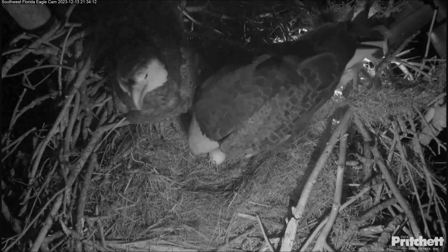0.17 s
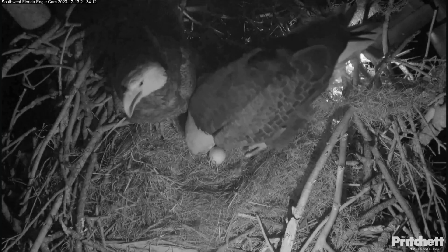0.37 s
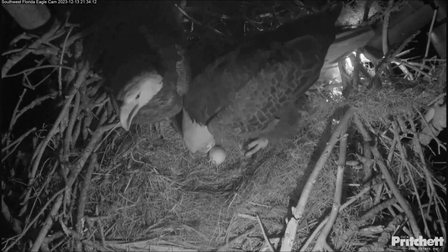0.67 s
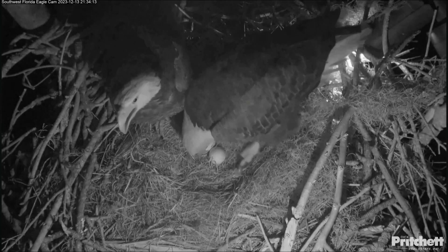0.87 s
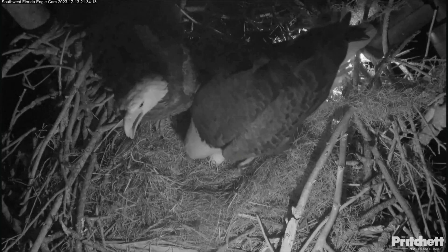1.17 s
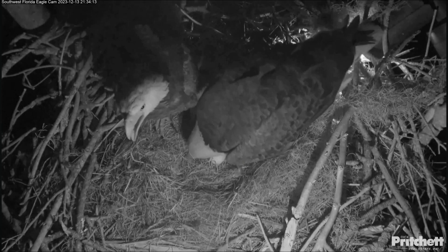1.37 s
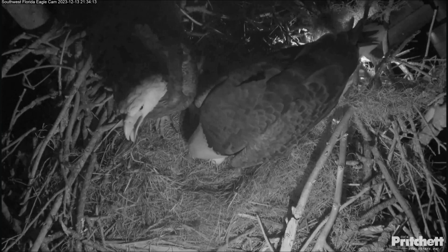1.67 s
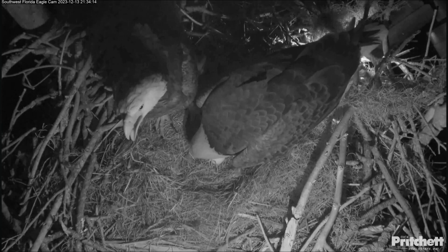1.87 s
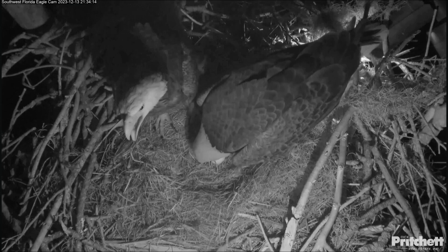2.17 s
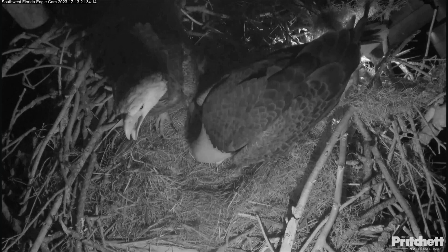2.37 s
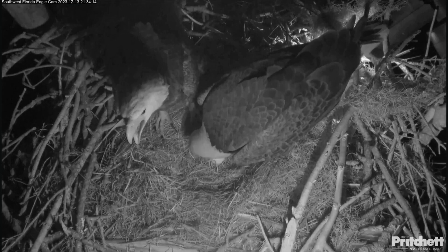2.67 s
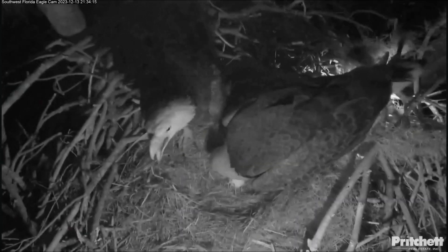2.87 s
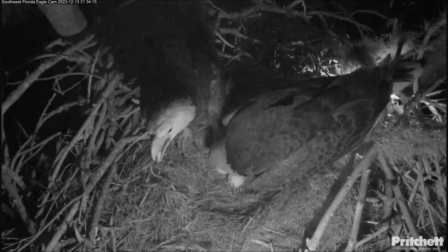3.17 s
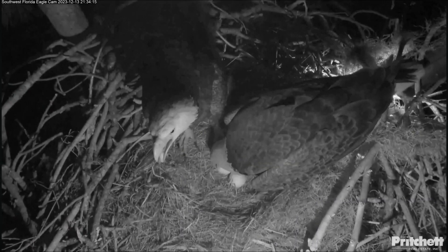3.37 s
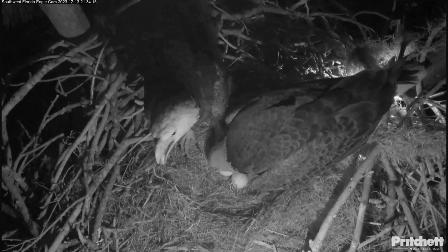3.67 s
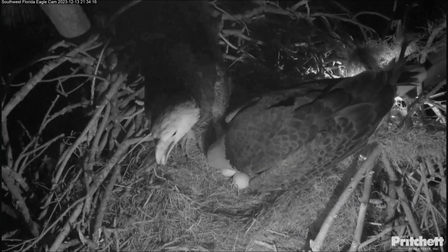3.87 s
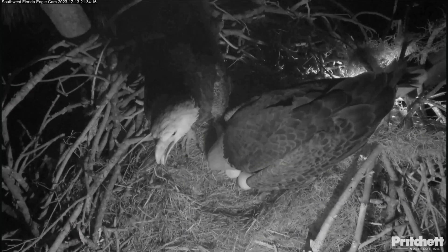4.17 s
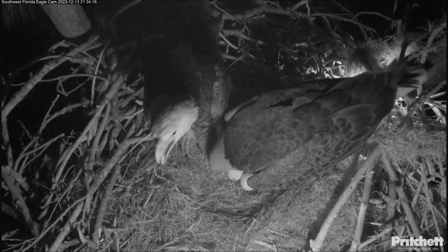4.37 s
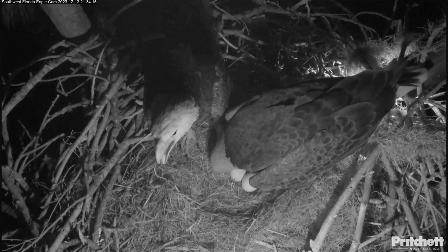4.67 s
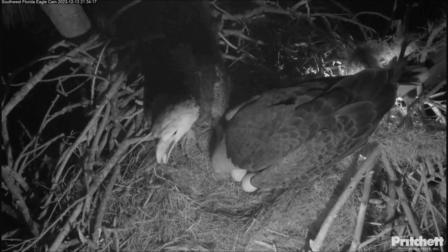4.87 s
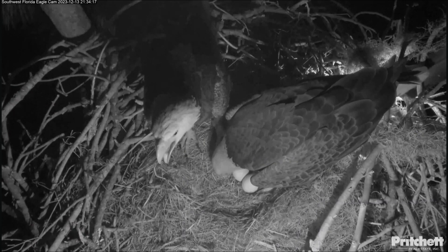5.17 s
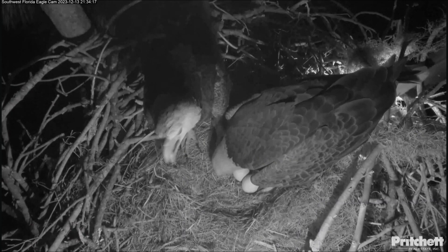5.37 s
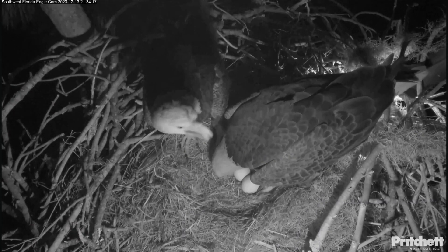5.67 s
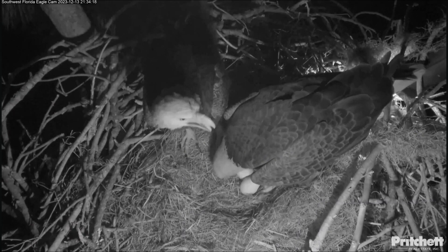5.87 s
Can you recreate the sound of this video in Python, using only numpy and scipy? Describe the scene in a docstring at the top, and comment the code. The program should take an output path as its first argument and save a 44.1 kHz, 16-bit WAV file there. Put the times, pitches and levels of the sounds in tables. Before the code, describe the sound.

A quiet night outdoors, heard close to a nest. From the start low wind bumps the microphone, with a strong muffled gust around 0.55-0.8 s and faint dry twig ticks near 0.4, 0.8 and 1.2 s. The sound drops out for an instant at 1.33 s. At 1.55 s a large bird starts chittering: a short trill, then very short, piercing, slightly raspy whistles about every eighth of a second, loudest at 1.7 s and fading to tiny clicky chirps by 2.5 s. Soft wind, faint far tyre roar and thin needle hiss remain; a twig ticks at 3.3 s. At 4.1 s a squeak and brief hoarse hiss lead into loud sharp calls at 4.3 and 4.5 s and a rougher, falling one at 4.75 s. Wind rumble continues, gusting near 5.7 s, with another tiny dropout, until 6 s.

```python
"""A bald eagle on its nest at night, close to a small outdoor microphone, with far traffic behind.
Wind bumps the microphone from the start, three twigs tick, and the sound cuts out briefly near 1.3 s.
From 1.5 s comes a run of sharp chitters: short trilled whistles, two sets of sine partials that beat
where they overlap. A twig ticks at 3.3 s; from 4.1 s a second run has a squeak, a hoarse hiss and loud calls.
Wind, a swelling and fading tyre roar and a thin hiss of needles, all shaped noise, last to the end."""
import sys
import numpy as np
from scipy import signal
from scipy.fft import rfft, irfft, next_fast_len
from scipy.io import wavfile
from scipy.ndimage import uniform_filter1d

SR = 44100
rng = np.random.default_rng(int(sys.argv[2]) if len(sys.argv) > 2 else 0)


def transcribe(u):
    """Save the signal u as a 16-bit wav file named by the first command-line argument.

    u: samples, shape (n,) or (channels, n), limited to [-1, 1]; the rate is SR.
    q: integer samples, one column per channel.
    """
    v = np.clip(np.atleast_2d(u).T, -1, 1)
    q = np.round(v * 32767).astype(np.int16)
    wavfile.write(sys.argv[1], SR, q)


N = 265393
TIME = np.arange(N) / SR
EDGE_HZ = 15500  # upper limit of the microphone


def gain_of(db):
    """Turns decibels into an amplitude factor."""
    return 10 ** (np.asarray(db) / 20)


def evened(x):
    """Scales to rms 1."""
    return x / np.sqrt(np.mean(x ** 2) + 1e-20)


def read(points, hz):
    """Reads a spectrum's dB at the given frequencies, along a log frequency axis."""
    point_hz, point_db = np.transpose(points)
    return np.interp(np.log(hz + 1), np.log(point_hz + 1), point_db)


def follow(rows, column=1):
    """Draws one column of a time curve at every sample."""
    rows = np.asarray(rows)
    return np.interp(TIME, rows[:, 0], rows[:, column])


def add(mix, start_s, sound):
    """Mixes a sound in at its start time."""
    part = mix[max(round(start_s * SR), 0):][:len(sound)]
    part += sound[:len(part)]


def noise(colour):
    """Gaussian noise of rms 1, filtered to the given spectrum."""
    size = next_fast_len(N)
    white = rfft(rng.standard_normal(size))
    hz = np.fft.rfftfreq(size, 1 / SR)
    return evened(irfft(white * gain_of(read(colour, hz)), size)[:N])


def wander(rate_hz):
    """Smooth random motion of rms 1, low-passed around the given rate."""
    size = next_fast_len(N)
    white = rfft(rng.standard_normal(size))
    hz = np.fft.rfftfreq(size, 1 / SR)
    return evened(irfft(white / (1 + (hz / rate_hz) ** 4), size)[:N])


def ticks(rows, colour, decay_s, rise_s=0.00058):
    """Tiny noise bursts with a quick rise and an exponential decay."""
    t = np.arange(2048) / SR
    shape = np.exp(-t / decay_s) * np.tanh(t / rise_s) ** 2
    envelope = np.zeros(N)
    for start_s, level_db in rows:
        add(envelope, start_s, gain_of(level_db) * shape)
    return envelope * noise(colour) / 2


def soft_window(width_s):
    """A two-sided exponential of sum 1, for smoothing."""
    window = np.exp(-2 * abs(np.arange(-2048, 2049) / SR) / width_s)
    return window / window.sum()


# trilled whistles close to the microphone; those that overlap come from the two sides of the syrinx.
# First run: a trill, four sharp calls, three fading chitters.
# Second run: a squeak, a hoarse stretch, three loud calls.
# start_s, length_s, strokes, start_hz, end_hz, droop (share of pitch, per stroke), level_db,
# peak_place (0-1), rasp_db and bright_db (both relative to the level, before the trims below)
WHISTLES = [ (1.544, 0.012, 1, 4310, 3680, 0.012, -56.5, 0.6, -30, -34),
            (1.562, 0.011, 1, 4360, 3960, 0, -48.5, 0.6, -23, -36.5),
            (1.573, 0.047, 1, 3480, 3090, 0, -49, 0.83, -31.5, -55.5),
            (1.577, 0.046, 3, 4240, 3560, .14, -38, 0.36, -28, -30),
            (1.625, 0.027, 2, 3320, 3580, 0.12, -53, 0.73, -17.5, -33),
            (1.675, 0.023, 2, 5160, 5290, 0.038, -30.5, 0.76, -47, -54.5),
            (1.679, 0.0093, 1, 4270, 4140, 0.072, -36, 0.6, -21, -40),
            (1.688, 0.015, 1, 4450, 4196, 0, -26.5, 0.75, -38, -40.5),
            (1.696, 0.029, 1, 4280, 4200, 0.027, -23, 0.16, -42, -29),
            (1.801, 0.013, 1, 5580, 5130, 0.0047, -45.5, 0.5, -16.5, -50),
            (1.817, 0.027, 2, 5270, 5100, 0.078, -36, 0.25, -36, -61),
            (1.805, 0.026, 3, 4560, 4170, .01, -36.5, 0.47, -37.5, -48),
            (1.832, 0.027, 2, 4250, 3920, 0.065, -36, 0.03, -24.5, -48),
            (1.847, 0.01, 1, 3280, 3080, 0, -55.5, 0.64, -10.5, -40),
            (1.942, 0.012, 2, 4210, 4040, 0.13, -43, 0.05, -13, -55),
            (1.943, 0.0084, 1, 5030, 4950, 0, -47.5, .5, -25, -51),
            (1.959, 0.013, 2, 4400, 4130, 0.08, -36, 0.2, -22, -60),
            (1.975, 0.018, 1, 4360, 3710, 0.024, -42.5, .5, -32, -52),
            (1.976, 0.0095, 1, 3500, 2870, 0.0071, -49.5, 0.56, -20.5, -49.5),
            (2.089, 0.01, 1, 3870, 4190, 0, -39, 1, -29, -66),
            (2.099, 0.0082, 1, 3250, 3100, 0, -47.5, .5, -24, -47),
            (2.107, 0.032, 4, 3253, 3080, 0.013, -39, 0.4, -12, -58),
            (2.228, 0.015, 1, 4330, 4120, 0.031, -62.5, .5, -9, -38),
            (2.246, 0.0068, 1, 3270, 3430, 0.018, -60, .5, -7, -42),
            (2.247, 0.0056, 1, 3970, 4450, 0.0031, -55.5, .5, -18.5, -35.5),
            (2.343, 0.0052, 1, 4080, 4430, 0.016, -70.5, 0.52, -20.5, -33),
            (2.345, 0.0085, 1, 5260, 5400, 0, -63.5, 0.54, -23.5, -36.5),
            (2.363, 0.0085, 1, 4300, 4170, 0, -66.5, .5, -2.5, -26),
            (2.453, 0.0064, 1, 3810, 4000, 0.051, -67, 0.42, -20, -43.5),
            (4.111, 0.011, 1, 4460, 3680, 0.023, -39, 0.75, -33, -65),
            (4.118, 0.018, 1, 3156, 3213, 0, -36, 0.25, -37.5, -55),
            (4.217, 0.0062, 1, 4810, 5030, 0.0092, -43.5, .5, -22, -59),
            (4.218, 0.0087, 1, 4260, 3690, 0.011, -44.5, .5, -26, -48),
            (4.232, 0.013, 1, 4140, 3780, 0.032, -44, 0.4, -27, -59),
            (4.235, 0.012, 1, 3270, 2690, 0, -51, .5, -13, -51),
            (4.315, 0.007, 1, 6640, 5450, 0.038, -47, 0.47, -16, -37),
            (4.322, 0.004, 1, 5200, 5120, 0.095, -31, .5, -32, -55),
            (4.323, 0.007, 1, 4200, 4640, 0, -38.5, 0.3, -24.5, -54),
            (4.327, 0.033, 2, 5290, 5420, 0.049, -25.5, .4, -46.5, -60),
            (4.342, 0.032, 2, 4520, 4033, 0.043, -28.5, 0.77, -45.5, -53),
            (4.506, 0.012, 1, 4000, 4250, 0.026, -33.5, .5, -12, -54),
            (4.515, 0.015, 1, 3190, 3370, 0.012, -26.5, .7, -31, -38),
            (4.527, 0.01, 1, 4590, 3980, 0, -35, .5, -11, -56),
            (4.538, 0.020, 2, 3420, 3176, 0.0059, -29, 0.45, -23, -41),
            (4.557, 0.015, 1, 3250, 2940, 0, -41, 0.1, -11.5, -37),
            (4.752, 0.017, 1, 3210, 2930, 0, -40.5, 0.56, -16, -45.5),
            (4.755, 0.011, 1, 5330, 5300, 0.01, -53, .5, -9, -33.5),
            (4.773, 0.04, 3, 3218, 2894, 0.091, -37, 0.38, -21, -42),
            (4.82, 0.0056, 1, 2840, 2430, 0.016, -63.5, .5, -14, -39.5)]
# second partial: pitch_hz, level_db (relative to the whistle)
OCTAVE = [(4000, -24), (5600, -15), (6100, -19.5), (6500, -7), (6850, -13), (7600, -32.5), (8500, -41),
          (10400, -51.5), (13000, -45.5)]
# third and fourth partials: pitch_hz, level_db (relative to the brightness)
OVERTONES = [(7000, -10), (8500, 4.5), (9700, 5.5), (11200, -4.5), (12300, -4), (12900, 2.5), (13800, -13),
             (16000, -33)]
# breath colour of the throat: pitch_hz, level_db (relative)
THROAT = [(600, -19.5), (1800, -12.5), (2400, 3.5), (2750, -12.5), (3300, 3.5), (4200, 1.5), (5300, -5),
          (6300, -11.5), (7200, -19), (8300, -28.5), (11000, -35.5), (15000, -39.5)]
# treble air noise of a forced whistle: pitch_hz, level_db (relative)
FIZZ = [(4500, -33.5), (6500, -0.5), (8300, 4), (9000, -3.5), (11200, -11), (12500, 1.5), (13500, 5),
        (14400, -0.5), (15200, -28)]
STROKE_OVERLAP_S = 0.0001
STROKE_ARCH = .008  # bulge in the middle of each stroke, share of the pitch
FADE_DB_PER_S = 340  # a whistle weakens on both sides of its peak


def syrinx(jitter=0.0041, rasp_jitter=.05, waver=.006, blur=.11, growth=.6, shimmer=0.14, edge=0.8,
           overtone_db=-1, octave_db=0.5, rasp_trim_db=-3, fizz_db=-4.0,
           leak_db=-47, leak_power=0.52, leak_s=0.026):
    """Gliding whistles break into strokes that swell and droop; raspy ones shake and carry air noise."""
    voice, air, fizz, effort = np.zeros((4, N))
    shake, flutter, drift = wander(1200), wander(450), wander(200)
    phases = rng.random(len(WHISTLES))
    for whistle, phase in zip(WHISTLES, phases):
        start_s, length_s, strokes, start_hz, end_hz, droop, level_db, peak_place, rasp_db, bright_db = whistle
        bounds = np.linspace(start_s, start_s + length_s, round(strokes) + 1)
        pitch_shake = jitter + rasp_jitter * gain_of(rasp_db)
        for begin, end in zip(bounds, bounds[1:]):
            first = round((begin - STROKE_OVERLAP_S) * SR)
            last = round((end + STROKE_OVERLAP_S) * SR)
            at = np.arange(first, last)
            in_stroke = np.linspace(0, 1, len(at))
            along = (TIME[at] - start_s) / length_s
            arch = abs(np.sin(np.pi * in_stroke))

            glide_hz = start_hz + (end_hz - start_hz) * along
            pitch_hz = glide_hz * (1 + droop * (.5 - in_stroke) + STROKE_ARCH * (arch - np.pi / 4))
            shaken_hz = pitch_hz * (1 + pitch_shake * shake[at] + waver * drift[at])
            angle = 2 * np.pi * (phase + np.cumsum(shaken_hz) / SR)

            octave_gain = gain_of(read(OCTAVE, 2 * pitch_hz)) + gain_of(bright_db + octave_db)
            upper = octave_gain * np.sin(2 * angle)
            for k in (3, 4):
                partial_gain = gain_of(bright_db + overtone_db + read(OVERTONES, k * pitch_hz))
                audible = k * pitch_hz < EDGE_HZ
                upper += partial_gain * audible * np.sin(k * (angle + blur * shake[at]))

            swell = evened(arch ** edge * np.exp(shimmer * flutter[at]))
            fade_db = FADE_DB_PER_S * length_s * abs(along - peak_place)
            envelope = gain_of(level_db - fade_db) * swell
            # overtones grow faster than the fundamental as the membranes swing wider
            drive = (envelope / gain_of(level_db)) ** growth
            voice[at] += np.sqrt(2) * envelope * (np.sin(angle) + drive * upper)
            air[at] += envelope * gain_of(rasp_db + rasp_trim_db)
            fizz[at] += envelope * drive * gain_of(bright_db + fizz_db)
            effort[at] += envelope
    # air keeps flowing just before, between and after the strokes; quiet calls are the airiest
    leak = gain_of(leak_db) * signal.oaconvolve(effort ** leak_power, soft_window(leak_s), "same")
    return voice + np.hypot(air, leak) * noise(THROAT) + fizz * noise(FIZZ)


# clicks of the throat opening at the start of a call: start_s, level_db (relative)
CLICKS = [(1.674, -53), (1.797, -43.5), (1.937, -49), (2.087, -37), (2.226, -43), (2.343, -41.5),
          (2.453, -53.5), (4.312, -37), (4.504, -51), (4.749, -49)]


def throat_clicks(trim_db=-2):
    """The throat opens with small bursts of breath-coloured noise."""
    return gain_of(trim_db) * ticks(CLICKS, THROAT, decay_s=.0035, rise_s=0.00064)


# hoarse hiss between two calls: time_s, level_db
HISS = [(4.132, -93), (4.141, -61.5), (4.175, -64.5), (4.208, -56.5), (4.218, -65), (4.25, -86)]
# its colour: pitch_hz, level_db (relative)
HISS_COLOUR = [(600, -11), (1700, 4.5), (2300, -1), (2900, -2), (4000, 0), (5100, 0), (6300, -15.5),
               (7500, -28), (12000, -34)]


def hoarse_hiss():
    """Breath noise follows a level curve and is silent outside it."""
    sounding = (TIME > HISS[0][0]) & (TIME < HISS[-1][0])
    return gain_of(follow(HISS)) * sounding * noise(HISS_COLOUR)


# faint arched tone inside the hoarse hiss: start_s, length_s, end_hz (at both ends), top_hz, level_db
GROAN = [(4.155, 0.042, 1860, 2367, -59.5)]


def groan(jitter=0.023):
    """A weak, unsteady sine rises and falls once in pitch and level."""
    start_s, length_s, low_hz, top_hz, level_db = GROAN[0]
    arch = np.sin(np.linspace(0, np.pi, round(length_s * SR)))
    hz = (low_hz + (top_hz - low_hz) * arch) * (1 + jitter * wander(890)[:len(arch)])
    tone = arch * np.sin(2 * np.pi * np.cumsum(hz) / SR)
    out = np.zeros(N)
    add(out, start_s, gain_of(level_db) * evened(tone))
    return out


def eagle(coupling=.2):
    """Whistles, throat clicks and one hoarse hiss with a tone in it."""
    whistles = syrinx()
    # the two sides share one airflow, which adds faint sum and difference tones
    highpass = signal.butter(2, 700, "highpass", fs=SR, output="sos")
    mixed_tones = signal.sosfilt(highpass, whistles ** 2)
    return whistles + groan() + coupling * mixed_tones + throat_clicks() + hoarse_hiss()


# twigs in the nest: start_s, level_db (relative)
TWIGS = [(0.4344, -64.5), (0.7756, -58.5), (1.1787, -61), (3.2594, -61)]
# their colour: pitch_hz, level_db (relative)
TWIG_COLOUR = [(500, -5), (1700, 4.5), (4500, -0.5), (7000, -8.5), (15000, -13)]


def twigs():
    """Dry twigs tick as tiny, fast-dying noise bursts."""
    return ticks(TWIGS, TWIG_COLOUR, decay_s=0.0027)


def nest(x, echo_db=-28, t60_s=.05):
    """The sticks of the nest scatter a short, faint echo: decaying noise after a 2 ms gap."""
    t = np.arange(SR // 4) / SR
    echo = rng.standard_normal(len(t)) * (t > .002) * gain_of(-60 * t / t60_s)
    echo = gain_of(echo_db) * echo / np.linalg.norm(echo)
    return x + signal.fftconvolve(x, echo)[:N]


# steady wind on the microphone: time_s, level_db
WIND = [(0, -55.5), (0.85, -55), (1.05, -62.5), (1.9, -64), (2.4, -62), (3.05, -61), (3.55, -63),
        (4.3, -59.5), (5.2, -58), (6.02, -59.5)]
# gusts on top of it: peak_s, decay_s, level_db (at the peak)
GUSTS = [(0.061, 0.038, -52.5), (0.564, 0.13, -38.5), (0.701, 0.055, -42.5), (0.86, 0.029, -49.5),
         (1.15, 0.05, -50), (3.241, 0.025, -53), (4.41, 0.022, -48), (4.70, .1, -52), (5.65, 0.095, -47),
         (5.815, .03, -44.5)]
# colour of the weaker wind: pitch_hz, level_db (per Hz, relative)
WIND_COLOUR = [(15, 2.5), (38, 6), (80, -0.5), (150, -7.5), (200, -15.5), (350, -28.5), (450, -23),
               (700, -58), (3000, -89)]
# colour of the stronger wind: pitch_hz, level_db (per Hz, relative)
GUST_COLOUR = [(20, -4), (50, 1.5), (110, 5), (200, -0.5), (330, -8), (500, -19), (750, -32), (1500, -54.5),
               (4000, -87)]
GUST_RISE_S = 0.022


def wind(lumpy_db=3.0, gust_db=-55, span_db=3):
    """Lumpy buffeting that reaches higher as it blows harder; gusts build quickly and die away."""
    power = gain_of(follow(WIND)) ** 2
    for peak_s, decay_s, level_db in GUSTS:
        away = np.maximum((peak_s - TIME) / GUST_RISE_S, (TIME - peak_s) / decay_s)
        power = power + (gain_of(level_db) * np.exp(-away)) ** 2
    strength_db = 10 * np.log10(power)
    # the share of gust colour grows with strength, up to 1 / 3.5
    gust_share = 1 / (3.5 + np.exp((gust_db - strength_db) / span_db))
    eddies = np.sqrt(1 - gust_share) * noise(WIND_COLOUR) + np.sqrt(gust_share) * noise(GUST_COLOUR)
    return gain_of(strength_db) * evened(eddies * gain_of(lumpy_db * wander(35)))


# far traffic: time_s, roar_db, edge_db
TRAFFIC = [(0, -80, -96.5), (0.6, -73.5, -88.5), (1.05, -76, -87.5), (1.5, -79, -85.5), (2.0, -78, -85.5),
           (2.6, -72.5, -94.5), (3.5, -74.5, -87.5), (4.0, -70.5, -73.5), (4.4, -69.5, -80.5),
           (5.0, -70, -76.5), (5.5, -72.5, -74.5), (6.02, -77.5, -94)]
# colour of the tyre roar: pitch_hz, level_db (per Hz, relative)
ROAR = [(150, -13), (370, -14), (510, -3.5), (660, -7.5), (900, 0.5), (1300, 0), (1600, -10), (2000, -17),
        (3000, -39.5)]
# colour of its bright edge: pitch_hz, level_db (per Hz, relative)
ROAR_EDGE = [(1100, -21), (1550, 2), (1850, -5), (2200, -1.5), (2900, -14), (4000, -24.5), (7000, -35)]


def far_traffic():
    """Tyre roar and its bright edge are two noise bands that swell and fade on their own curves."""
    roar = gain_of(follow(TRAFFIC)) * noise(ROAR)
    edge = gain_of(follow(TRAFFIC, column=2)) * noise(ROAR_EDGE)
    return roar + edge


# breeze in the pine needles: time_s, level_db
NEEDLES = [(0, -91.5), (0.6, -89), (0.9, -86), (1.05, -80), (1.2, -89), (2, -83), (2.7, -84.5),
           (3.3, -82.5), (3.6, -85.5), (4.5, -88), (5.2, -83), (5.6, -89.5), (6.02, -91)]
# its colour: pitch_hz, level_db (per Hz, relative)
NEEDLE_COLOUR = [(1500, 1.5), (2700, -4.5), (3400, 0), (3900, -4), (4700, 1), (5400, -4), (6300, -12),
                 (8000, -21.5), (15000, -27.5)]


def needles():
    """A breeze in the needles is a thin treble noise of varying level."""
    return gain_of(follow(NEEDLES)) * noise(NEEDLE_COLOUR)


def scene():
    """The bird and the twigs in the nest, with the night around them."""
    return (nest(eagle() + twigs()) + wind() + far_traffic() + needles())[None]


# brief moments when the sound cuts out: start_s, end_s
DROPOUTS = [(1.332, 1.349), (5.735, 5.756)]
SELF_NOISE_DB = -100.5  # microphone hiss, before the band limit


def record(dry):
    """The microphone adds hiss, drops out briefly and passes only what lies below its upper limit."""
    live = np.ones(N)
    for start_s, end_s in DROPOUTS:
        live[(TIME > start_s) & (TIME < end_s)] = 0.0031
    hissing = dry + gain_of(SELF_NOISE_DB) * rng.standard_normal(N)
    sound = hissing * uniform_filter1d(live, size=80)  # softened cuts
    lowpass = signal.firwin(511, EDGE_HZ, window=("kaiser", 9), fs=SR)
    return signal.oaconvolve(sound, lowpass[None], "same")


dry = scene()
out = record(dry)
transcribe(out)
```